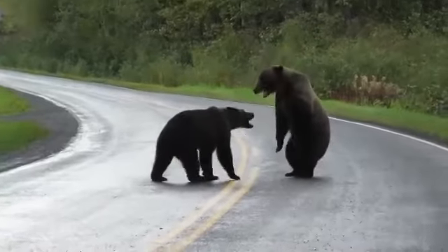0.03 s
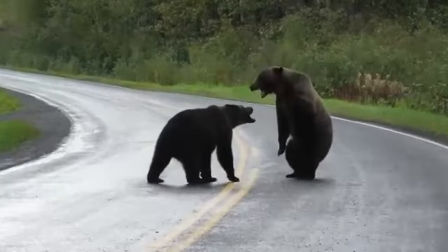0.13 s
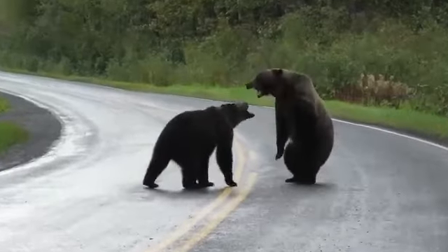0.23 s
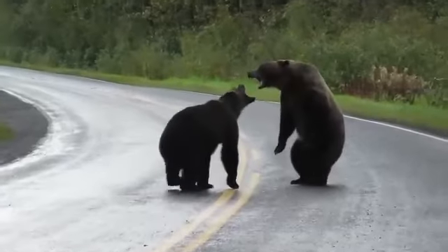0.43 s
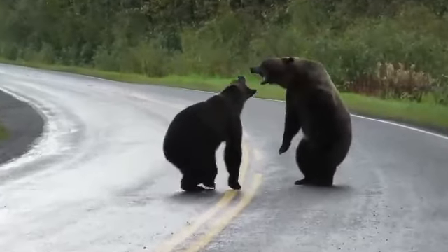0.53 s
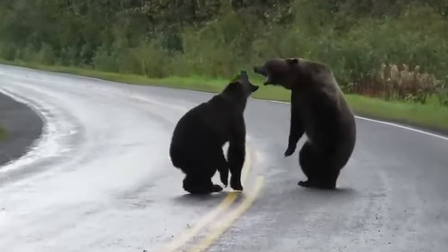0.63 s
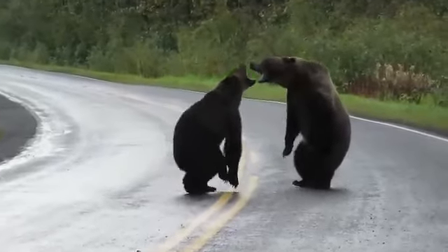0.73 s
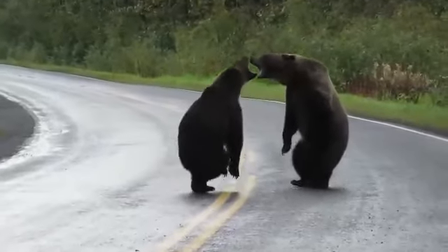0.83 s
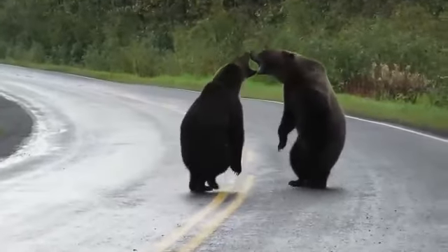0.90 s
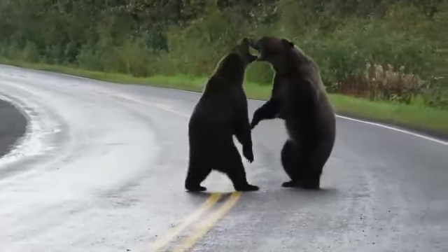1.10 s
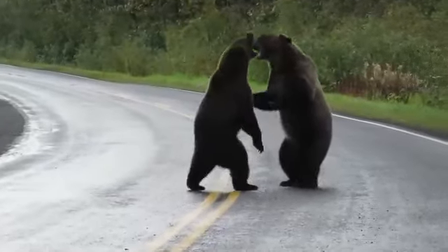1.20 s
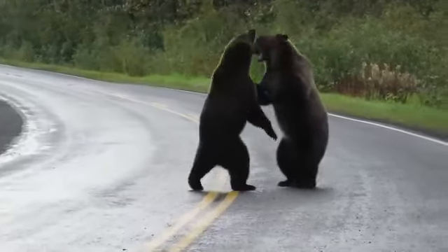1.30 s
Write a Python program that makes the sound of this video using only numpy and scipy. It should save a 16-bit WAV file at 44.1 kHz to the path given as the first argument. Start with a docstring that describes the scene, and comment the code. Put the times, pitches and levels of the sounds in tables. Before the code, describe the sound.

Bear moans: a dying tail and two faint claw ticks open, with a low grunt at 0.1 s. One bear's low, hollow moan swells from 0.2 s; a second joins around 0.35 s, their close pitches beating roughly with pulsing breath. From 0.75 s they sag and roughen, the first fading by 1.0 s, the second by 1.1 s. Slow creaks run to 1.3 s over soft outdoor air, slight echoes and low microphone bumps.

```python
"""The tail of an earlier sound, two faint claw ticks and a low grunt come first; then two bears moan on a road.
The voices are stacks of overtones so close in pitch that they beat; a run of slow creaks ends the calls.
Creaks are ringing pulses, ticks are short noise bursts, and breath is noise that pulses with the second voice.
Scattered echoes answer from the roadside, over soft air noise and low bumps on the phone some way off."""
import sys
import numpy as np
from scipy import signal
from scipy.fft import rfft, irfft
from scipy.io import wavfile
from scipy.ndimage import uniform_filter1d

SR = 44100
rng = np.random.default_rng(int(sys.argv[2]) if len(sys.argv) > 2 else 0)


def elevation(decibels):
    """Turn decibel levels (scalar or array-like) into linear amplitude ratios."""
    levels = np.asarray(decibels, float)
    return 10 ** (levels / 20)


def int16_out(signal):
    """Quantize to a 16-bit WAV file."""
    q = np.round(np.clip(np.atleast_2d(signal).T, -1, 1) * 32767)
    wavfile.write(sys.argv[1], SR, q.astype(np.int16))


N = 59535
t = np.arange(N) / SR  # time of each sample (s)
TIRED_FROM_S = .75  # the bears tire from here: voices grow rougher and the breath loses treble


def unit(x):
    """Scale a sound to an rms of 1."""
    return x / np.sqrt(np.mean(x ** 2))


def colour(x, points):
    """Filter by a curve of (Hz, dB) points, joined by straight lines over log frequency."""
    hz, db = np.array(points).T
    freq = np.maximum(np.arange(len(x) // 2 + 1) * SR / len(x), 1)
    return irfft(rfft(x) * elevation(np.interp(np.log(freq), np.log(hz), db)), len(x))


def walk(rate):
    """A smooth random curve around 0, rms about 1.7, from `rate` random levels a second."""
    hold = int(SR / rate)
    levels = np.repeat(rng.standard_normal(N // hold + 1), hold)
    return 2.3 * uniform_filter1d(uniform_filter1d(levels, hold), hold)[:N]


def fade(since_s, t60_s):
    """Exponential decay that falls 60 dB in t60_s."""
    return np.exp(-np.log(1000) * since_s / t60_s)


def voice(call, throat, turns=0.):
    """Overtones of the vocal folds, each as loud as the throat lets it be; returns sound and phase."""
    start_s, pitch_hz, level_db, shape = np.array(call).T
    throat = np.array(throat)
    last_shape = throat.shape[1] - 2
    meet_s = .395  # the two pitches cross about here; phase is counted from this moment
    coarse = slice(None, None, 64)  # the throat is worked out at every 64th sample

    pitch = uniform_filter1d(np.interp(t, start_s, pitch_hz), size=500) * (1 + .0015 * walk(70))
    cycles = np.cumsum(pitch) / SR
    phase = 2 * np.pi * (cycles - cycles[int(meet_s * SR)] + turns)
    gain = elevation(np.interp(t, start_s, level_db, left=-99, right=-99))
    gain = uniform_filter1d(uniform_filter1d(gain, size=200), size=200)
    mouth = np.clip(np.interp(t[coarse], start_s, shape), 0, last_shape)
    roughness = .17 * (1 + 4 * np.maximum(t - TIRED_FROM_S, 0))

    out = 0
    for k in range(1, 31):
        log_hz = np.log(k * pitch[coarse])
        throat_db = 0
        for j in range(last_shape + 1):  # blend the mouth shapes on either side
            share = np.clip(1 - abs(mouth - j), 0, 1)
            throat_db = throat_db + share * np.interp(log_hz, np.log(throat[:, 0]), throat[:, j + 1])
        shimmer_db = .3 * np.log2(k) * walk(29.83)
        loudness = elevation(np.interp(t, t[coarse], throat_db) + shimmer_db)
        # none on the fundamental, full from the sixth overtone up
        wobble = 1 + min((k - 1) / 5, 1) * roughness * walk(150)
        smear = .3 * k * k  # the throat spreads each pulse in time (radians)
        wander = .015 * k * walk(30)
        out = out - loudness * wobble * np.cos(k * phase - smear + wander)
    return gain * out, phase


def rings_and_creaks():
    """Decaying rings at two pitches each: two early ones, then single slow pulses of the closing folds."""
    # rings: start_s, level_db, pitch_hz
    # the first two rows: a dying tail and the low ring of the opening grunt; the rest are creaks
    rings = [(.001, -22, 471), (0.101, -22, 267), (1.106, -13.5, 480), (1.1418, -13.5, 520),
             (1.178, -12, 467), (1.2136, -14.5, 503), (1.25, -15, 474), (1.281, -20, 450)]
    out = 0
    for start_s, level_db, pitch_hz in rings:
        since = np.maximum(t - start_s, 0)
        ring = np.sin(2 * np.pi * pitch_hz * since) + 0.41 * np.sin(2 * np.pi * 1.45 * pitch_hz * since)
        rise = 1 - np.exp(-since / .0009)
        out = out + elevation(level_db) * rise * fade(since, t60_s=.036) * ring
    return out


def noise_band(centre_hz, spread):
    """Noise at rms 1, flat from centre / spread to centre * spread and falling away outside."""
    lowest, low = centre_hz / spread ** 5, centre_hz / spread
    high, highest = centre_hz * spread, centre_hz * spread ** 5
    return unit(colour(rng.standard_normal(N), [(lowest, -60), (low, 0), (high, 0), (highest, -60)]))


def breath(phase):
    """Air noise, pushed once in each cycle of the folds, its bands flaring on their own."""
    # breath effort: time_s, level_db
    effort = [(0.079, -46.5), (.25, -35.5), (0.36, -30), (0.479, -25.5), (.7, -27), (.9, -29),
              (1.05, -30.5), (1.121, -28.5), (1.299, -55.5)]
    # breath colour: pitch_hz, level_db (per Hz)
    hiss_colour = [(90, -64), (200, -26), (300, -13), (430, 4.5), (800, -5.5), (1500, -18), (3000, -26.5),
                   (3700, -36), (4400, -31.5), (8000, -43.5), (10300, -56.5), (12500, -49.5),
                   (15300, -70.5)]
    # hoarse puffs as the second call slackens: middle_s, level_db
    puffs = [(0.945, -47), (1.025, -47.5)]
    flare_db = .7  # multiplies each random walk

    gate = 1 + 0.42 * np.cos(phase)
    tired_db = -1.8 * np.maximum(t - TIRED_FROM_S, 0)  # for each step up the bands
    hiss = 0
    for k in range(9):
        flare = elevation(flare_db * walk(25) + k * tired_db)
        hiss = hiss + flare * noise_band(200 * 1.7 ** k, 1.3) * 1.797 ** (k / 2)
    hiss = unit(colour(gate * hiss, hiss_colour))

    puff_width_s = .035  # from the middle to 1/e
    swell = sum(elevation(level_db) * np.exp(-((t - middle_s) / puff_width_s) ** 2) for middle_s, level_db in puffs)
    rasp = noise_band(3170, 1.2) * gate * swell
    time_s, level_db = np.array(effort).T
    return hiss * elevation(np.interp(t, time_s, level_db) + flare_db * walk(25)) + rasp


def ticks():
    """Claws on the road: short scrapes of noise that start at once and die away."""
    # claw ticks: start_s, level_db
    scrapes = [(.0473, -41), (.1007, -37)]
    envelope = 0
    for start_s, level_db in scrapes:
        decay = fade(np.maximum(t - start_s, 0), t60_s=0.027)
        envelope = envelope + elevation(level_db) * (t > start_s) * decay
    claw_colour = [(400, -13.5), (1500, 0), (4000, -4.5), (15000, -34)]  # Hz, dB
    return envelope * unit(colour(rng.standard_normal(N), claw_colour))


def roadside(x):
    """A decaying scatter of echoes from road and bushes, after a gap of 12 ms."""
    tail = rng.standard_normal(N) * (t > .012) * fade(t, t60_s=.4)
    return signal.fftconvolve(x, tail / np.sqrt(np.sum(tail ** 2)))[:N]


def bumps():
    """Soft low bumps on the phone: sine tones that swell and fade briefly."""
    # bumps: middle_s, level_db, pitch_hz
    knocks = [(0., -35, 58), (0.384, -39.5, 45), (0.698, -50.5, 35.7), (.88, -46, 84.6),
              (1.08, -33.5, 108.5)]
    out = 0
    for middle_s, level_db, pitch_hz in knocks:
        since = t - middle_s
        swell = np.exp(-(since / 0.016) ** 2)
        out = out + elevation(level_db) * swell * np.sin(2 * np.pi * pitch_hz * since)
    return out


def open_air():
    """Steady coloured noise whose level drifts a little."""
    # colour of the air: pitch_hz, level_db (per Hz, relative)
    air_colour = [(25, -50.5), (70, -21), (130, -9.5), (250, -3.5), (500, 1), (900, -8.5), (2000, -16),
                  (5000, -35.5), (10000, -45), (15300, -64)]
    return unit(colour(rng.standard_normal(N), air_colour)) * elevation(-36.5 + 0.5 * walk(9.1))


def scene():
    """Voices near the middle, their echoes a little wide and dull; air and claws widest in the treble."""
    # calls: time_s, pitch_hz, level_db,
    # mouth shape (first bear: 0 shut, 1 open, 2 slack; second bear: 0 open, 1 slack)
    first_call = [(.095, 132.6, -45.5, 0.36), (.115, 134.7, -14, 0.39), (.15, 141.3, -21, 0.17),
                  (.165, 148.4, -30, 0.2), (.18, 149, -8.5, 0.41), (.212, 149, -10.5, 0),
                  (.225, 149.6, -2, 0.19), (.345, 153, 1.5, 0), (.395, 147.5, -2.5, 0.097),
                  (.43, 147, -2, .6), (.46, 141.6, 3, 0.74), (.54, 140.8, -2.5, 0.46), (.59, 139, 1, 1),
                  (.63, 133.6, -4, 1.1), (.69, 132, -0.5, 0.68), (.75, 126.8, -1, 2), (.83, 122, 0.5, 1.6),
                  (.87, 113.3, -1.5, 2.3), (.93, 109, -7, 2.3), (1.0, 106, -33.5, 2)]
    second_call = [(.33, 142.6, -10, 0), (.37, 147.3, -4, 0.12), (.42, 148.6, 1, 0.017),
                   (.48, 153.3, -0.5, 0), (.62, 149.7, 0, .05), (.73, 148.6, 0, 0.065),
                   (.775, 142.7, 1, 0.44), (.82, 142.8, 1.5, 0.18), (.86, 139.7, 0, 0.86),
                   (.93, 132.7, -1.5, 1), (.99, 132, -2, 1), (1.05, 120.6, -5.5, 1),
                   (1.09, 115.5, -15.5, 1), (1.12, 111.8, -29.5, 1)]
    # overtone levels: pitch_hz, then level_db for each mouth shape in turn
    first_throat = [(129, -31.5, -36.5, -37), (287, -54, -38.5, -32.5), (365, -18.5, -25.5, -24.5),
                    (443.1, -5, -13, -36), (520, -34, -30.5, -20), (596, -22, -33.5, -19.5),
                    (755, -27.5, -23.5, -36.5), (907, -35, -17, -27.5), (968, -45.5, -45.5, -54),
                    (1520, -53, -46, -44), (3920, -93, -83, -78)]
    second_throat = [(128, -39, -36), (269, -34.5, -25.5), (410, -10, -20.5), (465, -16.5, -22),
                     (592, -27, -22), (786, -23.5, -30), (860, -27, -52.5), (1050, -35.5, -66),
                     (1160, -29, -58), (1440, -41.5, -42.5), (1490, -29.5, -34.5), (1650, -45, -48),
                     (1685, -42, -44.5), (3700, -66.5, -61.5)]
    # side level of the echoes: pitch_hz, level_db
    echo_width = [(100, -27.5), (450, -5.5), (1000, -5), (2000, 4), (3500, -19)]
    # filter for the separate side noise of air and claws: pitch_hz, level_db
    air_width = [(60, -15.5), (500, -15), (3000, -12.5), (15000, -2)]

    first, _ = voice(first_call, first_throat)
    second, phase = voice(second_call, second_throat, turns=-0.3273)
    bears = first + second + breath(phase) + rings_and_creaks()
    middle = bears + elevation(-22) * roadside(bears) + open_air() + ticks() + bumps()

    echo_side = elevation(-21) * colour(roadside(bears), echo_width)
    air_side = colour(open_air() + ticks(), air_width)
    lean_left = (elevation(.4) - 1) * first  # the first bear is a little to the left
    side = echo_side + air_side + lean_left
    return np.array([middle + side, middle - side])


def band_limit(x):
    """A steep low-pass at the top of the band."""
    return signal.sosfilt(signal.butter(12, 15380, fs=SR, output="sos"), x)


def record(dry):
    """The phone's microphone cuts the bass."""
    # microphone response: pitch_hz, level_db
    microphone = [(20, -21.5), (80, -7), (115, -0.5), (20000, 0)]
    mix = np.array([colour(channel, microphone) for channel in dry])
    return band_limit(mix)


dry = scene()
out = record(dry)
int16_out(out)
```